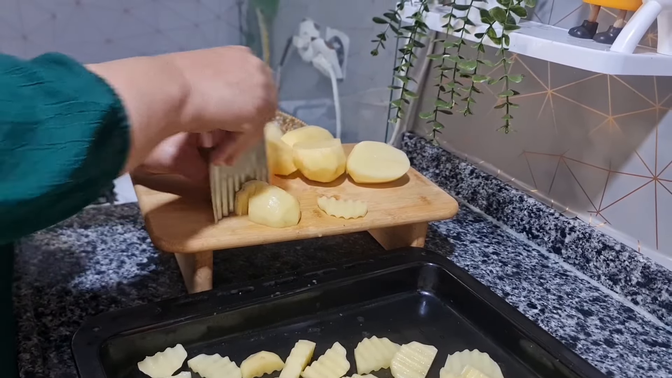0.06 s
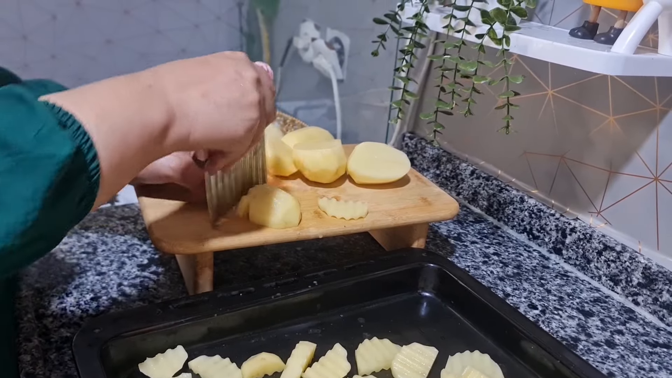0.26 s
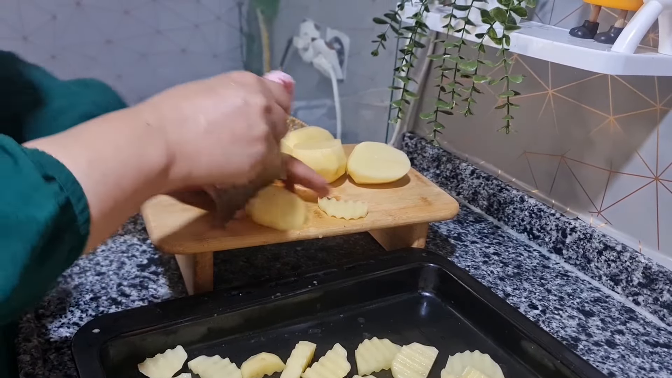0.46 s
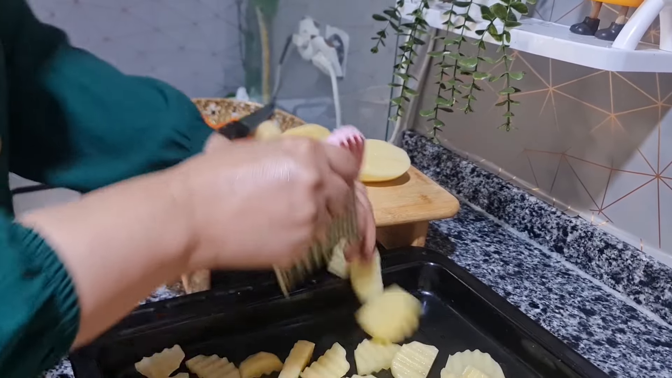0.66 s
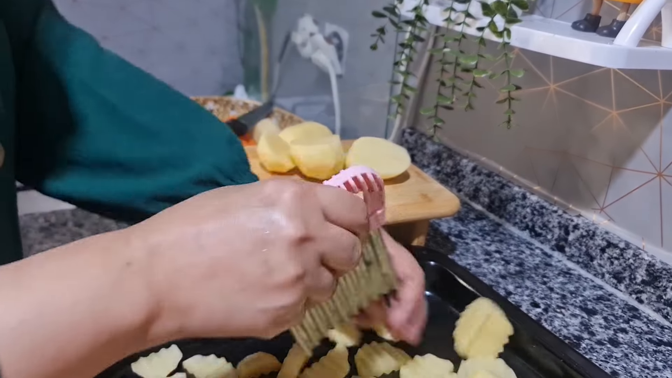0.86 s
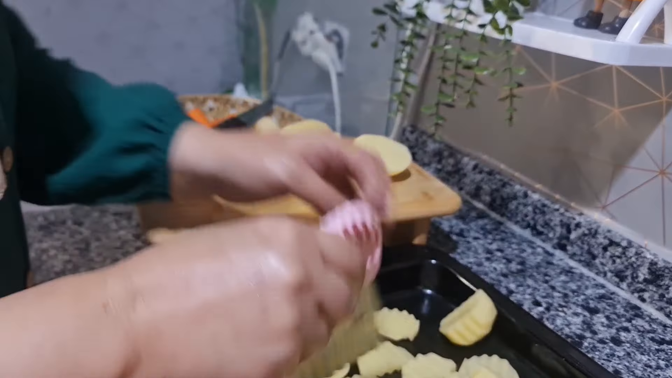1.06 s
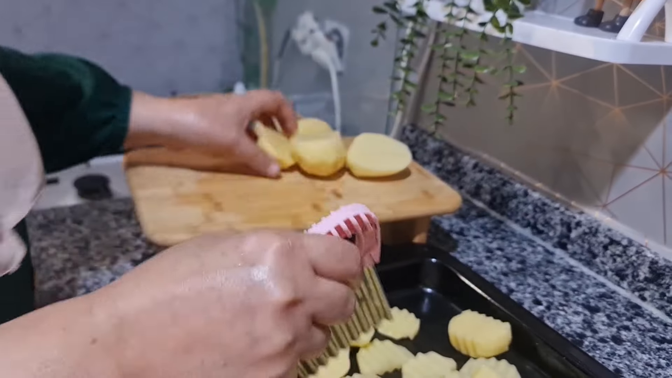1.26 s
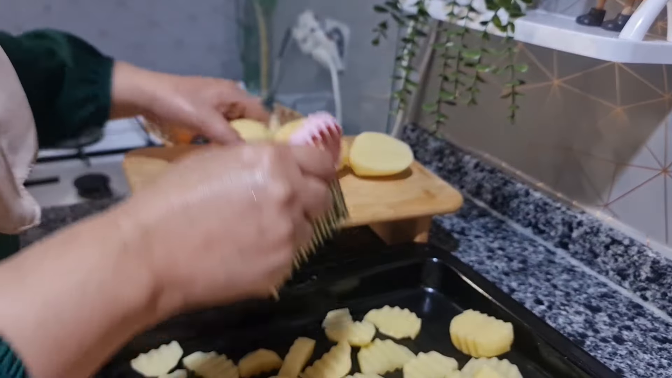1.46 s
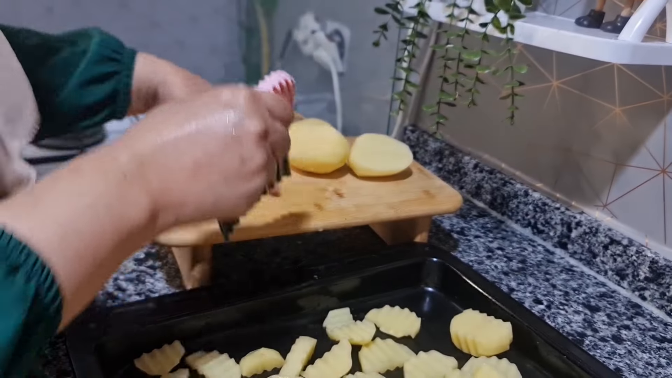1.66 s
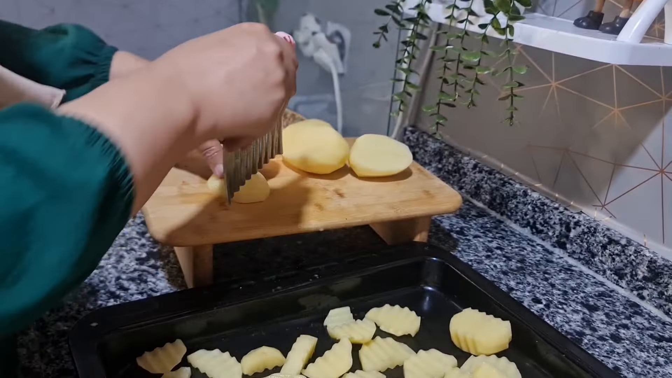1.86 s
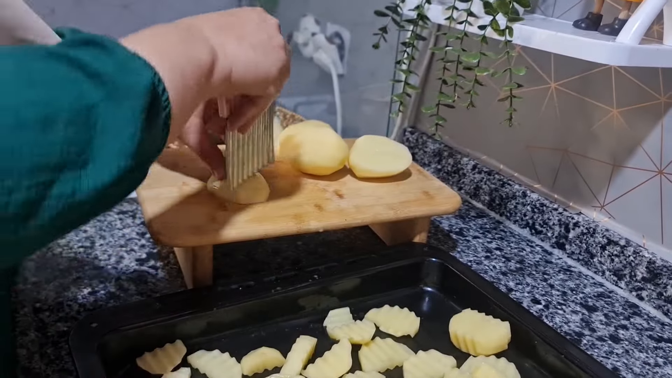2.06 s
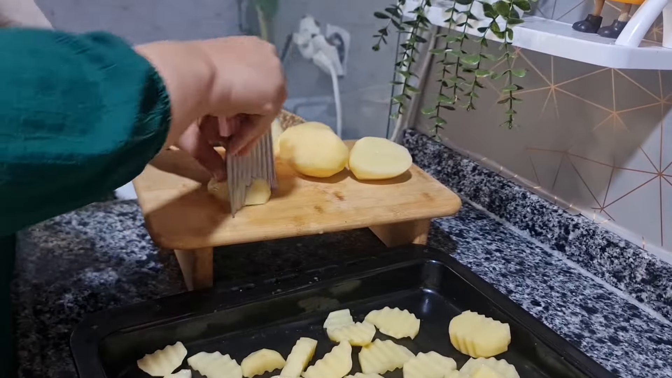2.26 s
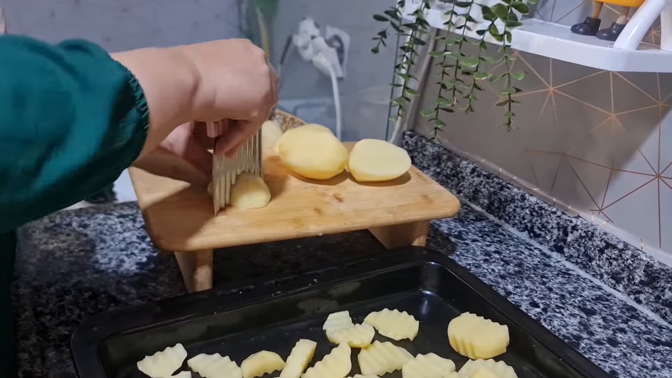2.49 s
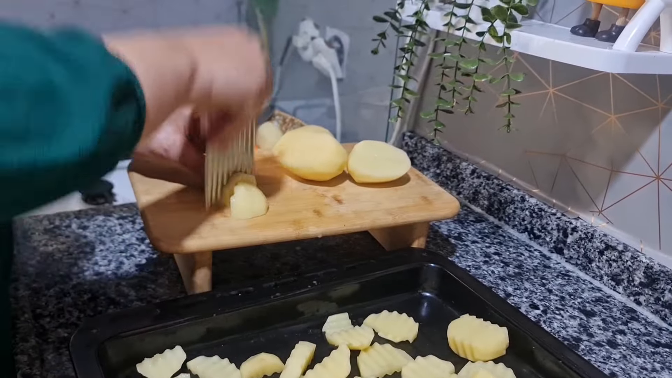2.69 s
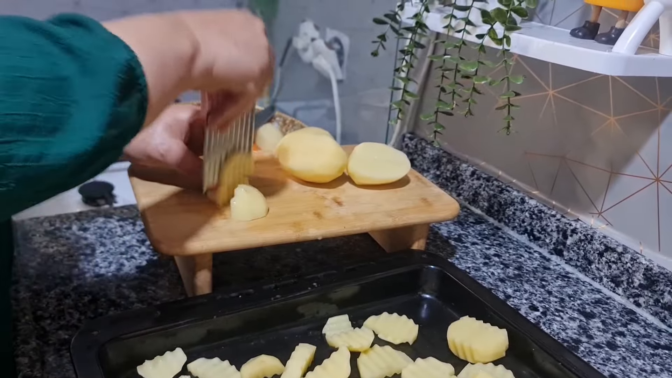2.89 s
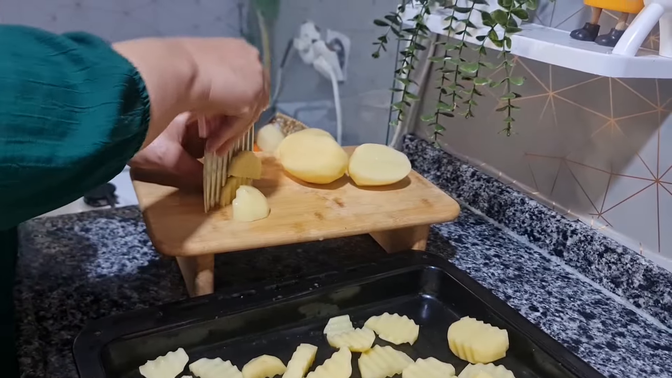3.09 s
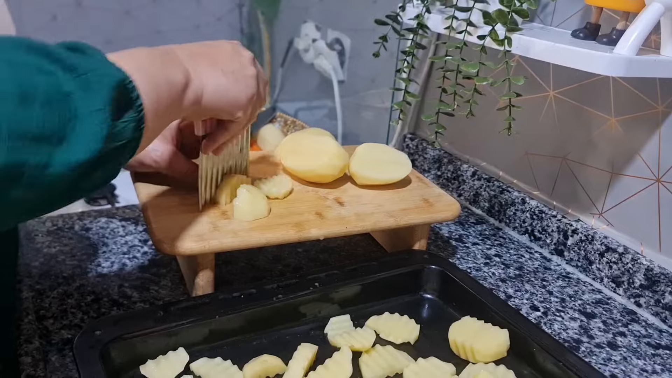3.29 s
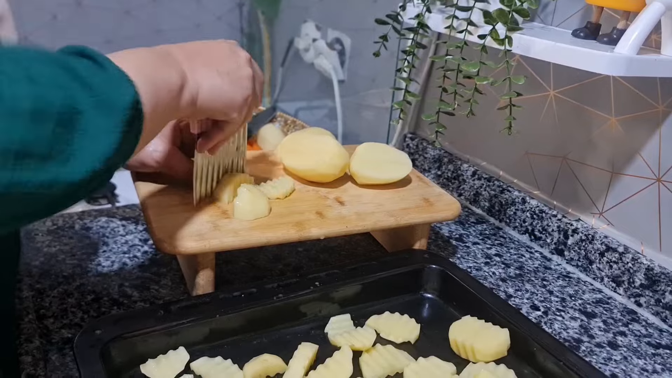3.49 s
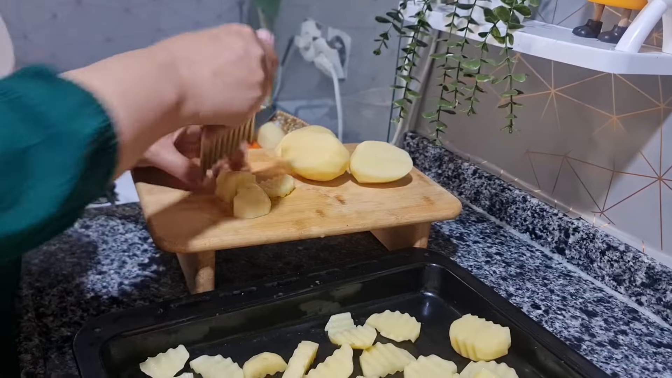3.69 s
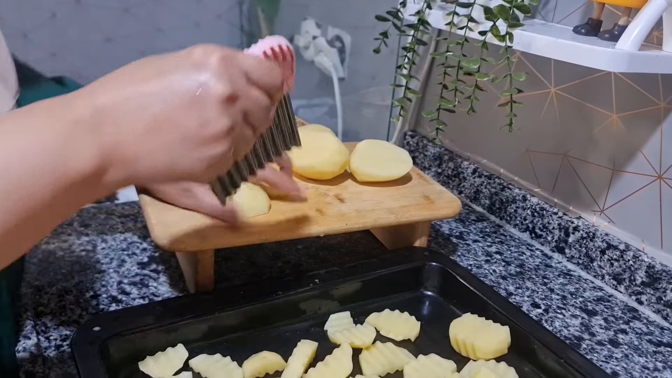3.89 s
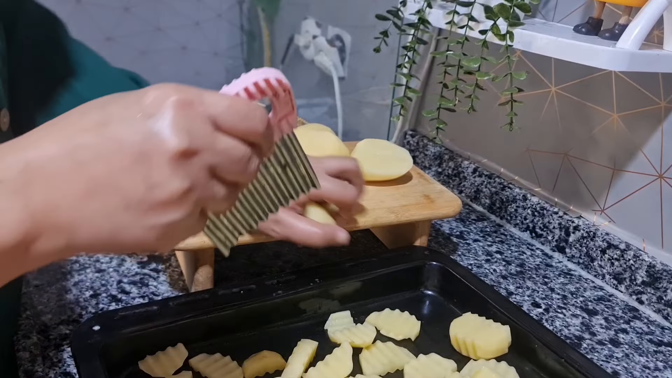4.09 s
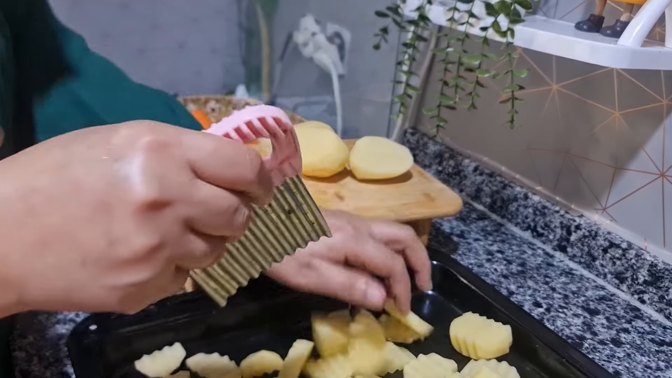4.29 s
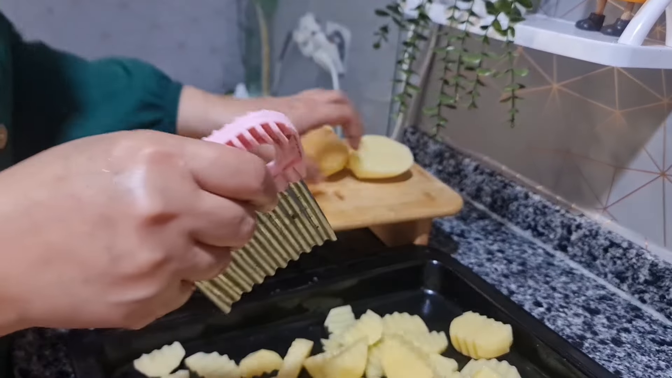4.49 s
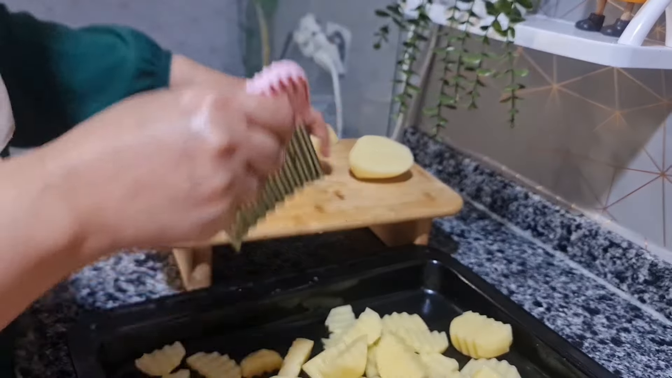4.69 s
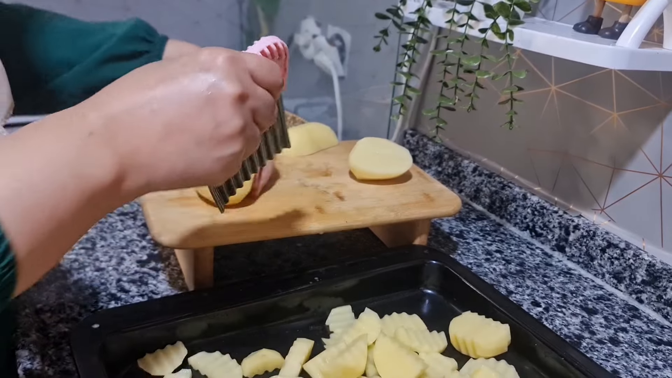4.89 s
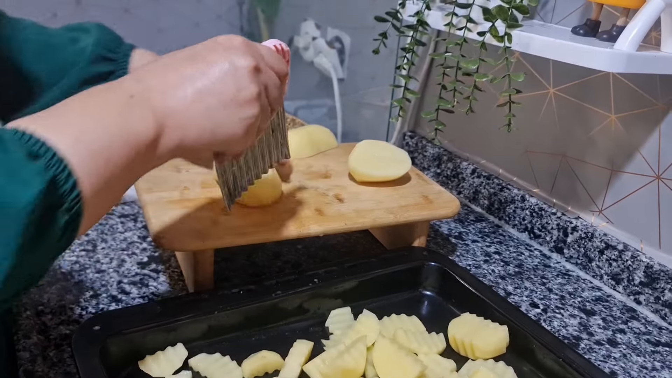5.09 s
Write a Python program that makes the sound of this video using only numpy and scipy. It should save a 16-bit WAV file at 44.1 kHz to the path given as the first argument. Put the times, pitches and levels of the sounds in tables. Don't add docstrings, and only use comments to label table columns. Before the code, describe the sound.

Loud crunchy chops of a wavy steel cutter through raw potatoes on a wooden board, after slices scrape and patter onto a metal tray.

```python
import sys
import numpy as np
from scipy import signal
from scipy.fft import rfft, irfft, next_fast_len
from scipy.io import wavfile
from scipy.ndimage import uniform_filter1d, map_coordinates

SR = 44100
rng = np.random.default_rng(int(sys.argv[2]) if len(sys.argv) > 2 else 0)


def generate_wav(sig):
    pcm = np.round(np.clip(np.atleast_2d(sig).T, -1, 1) * 32767).astype(np.int16)
    wavfile.write(sys.argv[1], SR, pcm)


def rack_gain(trim_db):
    fader = np.asarray(trim_db, float)
    return 10 ** (fader / 20)


N = 227070

# start in seconds, peak in
# dB, clack in dB, leg thud in dB, clack centre in Hz.
CHOPS = [
    (2.254, -10.5, -12.5, -22, 2310),
    (2.545, -11.5, -5, -18, 2740),
    (2.806, -13.5, 4, -18.5, 2900),
    (3.07, -13, 2, -16.5, 2665),
    (3.325, -13, -5, -22, 2040),
    (3.569, -8.5, -5.5, -24, 2435),
    (5.003, -19.5, -33, -12.5, 1510),
]
# start in seconds, peak in dB, clack in dB,
# thud in dB, hardness in Hz.
TAPS = [(0.362, -31, -3.5, -13, 1940), (0.385, -49, 8, 9, 1500), (0.512, -36, -25, -9, 1500),
        (1.44, -31.5, -28, -6.5, 600), (1.476, -61, -21, -15, 700), (1.831, -37, -5.5, -5.5, 2220),
        (1.841, -47, -24, 4, 900), (2.206, -28.5, -11, -7, 1410), (2.455, -43.5, -17.5, 7, 700),
        (2.498, -26.5, -17.5, -27.5, 1210), (2.769, -27, -16.5, -6.5, 1200), (3.016, -28, -22.5, -2, 1100),
        (3.028, -25, -15.5, -16, 1110), (3.294, -31.5, -5, 0, 1620), (3.722, -27, -9, -4.5, 1310),
        (4.648, -44.5, -19, 7, 880), (4.743, -36, -32, 2.5, 980), (4.988, -39, -25, -11, 500)]
BUMPS = [
    (1.431, -35, -21, -3.5, 600),
    (3.243, -39, -31, -15.5, 600),
    (3.31, -23.5, -27.5, -22, 700),
    (3.496, -34.5, -26.5, -4.5, 600),
    (3.571, -18, -34.5, -23.5, 700),
    (3.582, -14.5, -35.5, -27, 600),
]
SHOVES = [
    (4.984, -29.5, -40, -23, 400),
    (5.008, -26, -38, -27, 400),
    (5.128, -39.5, -31, -17, 500),
]
# start at the skin in seconds, length in seconds, force in dB, juice in dB.
CUTS = [
    (2.205, 0.062, -35, -9.5),
    (2.498, 0.059, -30.5, -10.5),
    (2.768, 0.057, -28, -13),
    (3.034, 0.056, -26.5, -13.5),
    (3.294, 0.044, -28.5, -15),
    (3.546, 0.028, -29, -12),
]
# time of full
# force in seconds, rise in seconds, fall in seconds, force in dB, rustle in dB.
RUBS = [(0, .01, 0.056, -38, -44), (.182, 0.045, 0.036, -61, -35), (.286, .02, 0.11, -81.5, 10.5),
        (.518, 0.028, 0.033, -52, -4), (.602, 0.043, 0.023, -30.5, -31), (.77, 0.086, 0.077, -52.5, -26),
        (.85, 0.046, 0.26, -60, -9), (1.14, 0.11, 0.64, -67.5, -7.5), (1.486, 0.12, 0.074, -60, -14),
        (1.72, 0.099, 0.24, -64.5, -21), (2.14, 0.075, 0.029, -67, -1), (2.19, 0.018, 0.011, -57.5, -2),
        (4.362, 0.014, 0.026, -55.5, -28), (4.62, 0.9, 0.26, -70.5, 1), (4.75, 0.072, 0.027, -60, -21)]
# time of full force in seconds, rise in seconds, fall in seconds, force in
# dB, skin noise in dB.
SWEEPS = [
    (.602, 0.044, .05, -59, 6.5),
    (.78, 0.044, 0.13, -65, 0),
    (4.0, 0.046, .2, -72.5, 7),
    (4.14, .22, 0.19, -57.5, -3),
    (4.67, 0.017, .1, -62, -23),
]
# start in seconds, peak in dB, clack in dB, thud in dB,
# clack centre in Hz.
DROPS = [
    (0.731, -38.5, -4, -15.5, 2940),
    (0.817, -36, 0.5, -30, 2260),
    (0.914, -31, 3.5, -14, 2500),
    (0.95, -29.5, 2, -11, 2380),
    (4.31, -52.5, 0.5, -15, 2260),
    (4.342, -41, 0, -20, 2920),
]
FLOPS = [
    (4.406, -39.5, -3, -13, 955),
    (4.435, -31.5, -5.5, -18, 1250),
    (4.467, -43, -11, -2, 1084),
]
TICKS = [
    (0.178, -61.5, 11, -18, 3140),
    (0.764, -39.5, -8, -24, 1260),
    (0.801, -49, 8.5, -22, 3050),
    (0.988, -40, 1, -2.5, 1150),
    (2.455, -67.5, 15, -20, 4410),
]
# start in seconds, peak in dB, clack in dB, thud in dB,
# hardness in Hz.
BOOMS = [
    (0.732, -30.5, -23, -0.5, 600),
    (0.76, -33.5, -21, -4.5, 500),
    (4.311, -38.5, -20, -14, 700),
    (4.328, -40.5, -25, -11, 500),
    (4.344, -35, -25, -11, 450),
    (4.468, -40, -25, -10, 453),
]
# start in seconds, peak in dB.
SMACKS = [(0.362, -43), (0.731, -40), (0.817, -55), (0.914, -45), (1.831, -43.5), (2.206, -47),
          (2.498, -50), (3.293, -37), (3.721, -43), (4.31, -51.5), (4.743, -72.5), (4.983, -62)]

# pitch in Hz, level in dB, time to fall by 60 dB in seconds.
BOARD = [(406.2, -7.5, 0.085), (523, -13, 0.076), (546.2, -7, 0.064), (592.4, -9, 0.065), (726, -7, 0.046),
         (835, -7.5, 0.05), (1052, 2, 0.023), (1099, 0, 0.019), (1420, -8, 0.036)]
LEGS = [(91.8, -7.5, 0.068), (133.5, -5.5, 0.089), (239.7, -3, 0.033), (291, -22.5, 0.37)]
HOLLOW = [(546.4, -3, 0.066), (600, -2, .07), (482, -11, 0.036), (667, -8.5, .04)]
WORKTOP = [(136, 0, 0.095), (89, -10.5, 0.17), (165, -5, .07)]
TRAY = [(302, -15.5, 0.014), (637, -8.5, 0.017), (950, -20, 0.029), (1330, -14, 0.0045)]
SHEET = [(136, -4, .12), (236, -0.5, 0.09), (306.5, 0, 0.08), (424, -5.5, 0.055), (600, -2.5, 0.048)]

# frequency in Hz, level in dB per Hz.
RASP = [(500, -14.5), (1200, 7), (2000, 6), (2900, 7.5), (3700, 0), (4500, -4.5), (6500, -3.5), (8500, -27)]
# frequency in Hz, level in dB per Hz.
KNOCK = [(300, -55.5), (420, 6), (1100, -1), (2000, -10), (3500, -28), (6000, -66.5)]
# frequency in Hz, level in dB per Hz.
FIZZ = [(5000, -37.5), (7000, 6.5), (10000, -4.5), (13000, -2), (15700, -10), (16400, -30.5)]
# frequency in Hz, level in dB per Hz.
RUSTLE = [(5200, -6.5), (6700, 2.5), (7700, -11), (10000, -16), (15700, -19.5), (16400, -35)]
# frequency in Hz, level in dB per Hz.
PALM = [(2500, -11), (4000, 4), (5500, -7), (6800, -3), (8000, -14), (12000, -13.5), (15700, -16),
        (16400, -46)]
# frequency in Hz, level in dB per Hz.
WET = [(1500, -20.5), (4000, 2.5), (6000, -1.5), (9000, -8), (15700, -5.5), (16400, -36.5)]
# frequency in Hz, level in dB per Hz.
HUSH = [(12, -44), (20, 2.5), (65, -0.5), (114, 0.5), (243, -17), (402, -12), (933, -27), (1100, -23),
        (1730, -27), (2630, -21.5), (6640, -40.5), (9300, -62.5), (14600, -58.5), (16300, -64.5)]
# frequency in Hz, time to fall by 60 dB in seconds.
WALLS = [(130, 0.58), (400, 0.38), (1000, 0.33), (3000, 0.3), (6000, 0.3), (13000, 0.16)]
# frequency in Hz, left-right likeness from -1 to 1.
ALIKE = [(60, 0.97), (130, 0.96), (290, 0.79), (640, 0.55), (1410, 0.04), (3100, -0.03), (6820, 0.05),
         (15000, -0.01)]
# frequency in Hz, left minus right in dB.
PORTS = [(60, -2.0), (110, -2.0), (200, -2.5), (380, -2.0), (700, -2.0), (1290, -2.0), (2380, -5.5),
         (4400, -6.5), (8120, -2.5), (15000, -1.0)]

HUSH_DB = -57
CRACK_T60, SMACK_T60 = 0.024, 0.018
CUT_SWELL_DB, CUT_FADE_S = 10.5, 0.011
RUB_ROUND = 1.31
TOP_HZ = 15850


def unit(x):
    return x / np.sqrt(np.mean(x ** 2) + 1e-20)


def along(points, hz):
    f, v = np.transpose(points)
    return np.interp(np.log(hz + 1), np.log(f + 1), v)


def filtered(x, response):
    m = next_fast_len(x.shape[-1] + SR // 10)
    return irfft(rfft(x, m) * response(np.fft.rfftfreq(m, 1 / SR)), m)[..., :x.shape[-1]]


def related(pair):
    def mix(hz):
        turn = np.arccos(np.clip(along(ALIKE, hz), -1, 1)) / 2
        return np.array([np.cos(turn), np.sin(turn)])
    mid, side = filtered(pair, mix)
    return np.array([mid + side, mid - side])


def ring(modes, scatter_db, attack, t):
    hz, db, t60 = np.transpose(modes)[:, :, None]
    strength, phase = rng.standard_normal((2,) + hz.shape)
    level = rack_gain(db + scatter_db * strength - 60 * t / t60)
    x = np.sum(level * np.sin(2 * np.pi * hz * t + phase), 0)
    x = x * (1 - np.exp(-t / attack))
    return x / np.max(np.abs(x))


def puff(spectrum, rise, t60, t):
    grain = rack_gain(1.2 * unit(uniform_filter1d(rng.standard_normal(len(t)), size=50)))
    click = np.arange(len(t)) == SR // 200
    x, click = filtered(np.array([rng.standard_normal(len(t)), click]), lambda f: rack_gain(along(spectrum, f)))
    x = x * grain * rack_gain(-60 * t / t60) * (1 - np.exp(-t / rise))
    x = x / np.max(np.abs(x))
    return np.array([x, click * np.linalg.norm(x) / np.linalg.norm(click)])


def contacts(table, body, attack, chatter, chatter_db, knock_db, crunch_t60, spread, crack_db, give, trim_db):
    out, t = np.zeros((2, N + SR)), np.arange(SR // 6) / SR
    soft = signal.butter(2, 2600, fs=SR, output="sos")
    body_db, clack_trim_db, leg_db = trim_db
    for s, db, clack_db, thud_db, clack_hz in table:
        touches, luck = np.zeros(SR // 10), rng.random((2, 6))
        touches[(chatter * SR * luck[0]).astype(int)] = rack_gain(chatter_db) * (2 * luck[1] - 1)
        touches[0] = 1
        wood = signal.fftconvolve(ring(body, 0.87, attack, t), touches)[:len(t)]
        wood = wood + rack_gain(knock_db) * puff(KNOCK, attack, crunch_t60, t)
        wood = rack_gain(body_db) * wood + rack_gain(leg_db + thud_db) * ring(LEGS, 0.57, 0.0018, t)
        band = [clack_hz / (1 + spread), min(clack_hz * (1 + spread), 7000)]
        spot = signal.butter(2, band, "band", fs=SR, output="sos")
        clack = signal.sosfilt(spot, puff(RASP, attack, crunch_t60, t))
        clack = clack / np.max(np.abs(clack[0]))
        blow = signal.sosfilt(soft, wood) + rack_gain(clack_trim_db + clack_db) * clack
        blow += rack_gain(crack_db) * puff(RASP, 0.00012, CRACK_T60, t)
        dull = signal.butter(4, give * clack_hz, fs=SR, output="sos")
        out[:, round(s * SR):][:, :len(t)] += rack_gain(db) * signal.sosfilt(dull, blow)
    return out[:, :N]


def board_blows():
    hits = contacts(CHOPS, BOARD, attack=0.00092, chatter=0.018, chatter_db=-12.5, knock_db=2.5,
                    crunch_t60=0.068, spread=0.76, crack_db=-10, give=2.73, trim_db=(-1, 8.5, 4.5))
    hits += contacts(TAPS, BOARD, attack=0.0045, chatter=0.014, chatter_db=-19, knock_db=-15.5,
                     crunch_t60=0.05, spread=1, crack_db=-25, give=1.25, trim_db=(-1, -1, -5.5))
    hits += contacts(BUMPS, HOLLOW, attack=0.0029, chatter=0.01, chatter_db=-8.5, knock_db=-8,
                     crunch_t60=0.05, spread=0.6, crack_db=-30, give=1.7, trim_db=(0, 0, 0))
    hits += contacts(SHOVES, WORKTOP, attack=0.0044, chatter=0.0073, chatter_db=-24, knock_db=-16,
                     crunch_t60=0.062, spread=0.6, crack_db=-41, give=2.4, trim_db=(0, 0, 0))
    return hits


def strokes(rows, swell_db):
    t = np.arange(N // 32 + 2) * 32 / SR
    gains = np.zeros((3, len(t)))
    for s, *shape, db, fizz_db in rows:
        gains += rack_gain(db + swell_db(t - s, *shape)) * rack_gain(np.array([[fizz_db], [0], [0]]))
    return np.array([np.interp(np.arange(N) / SR, t, g) for g in gains])


def friction(gains, top, grain_db, wood_hz, trim_db):
    first, last = np.flatnonzero(gains.max(0) > 1e-7)[[0, -1]]
    fizz, rasp, body = gains[:, first:last] * rack_gain(trim_db)[:, None]

    def grains():
        spikes = rack_gain(grain_db * unit(uniform_filter1d(rng.standard_normal(last - first), size=60)))
        return unit(related(rng.standard_normal((2, last - first))) * spikes)

    def wood(f):
        total = 0
        for k, (c, db, t60) in enumerate(BOARD):
            damping = 1j * f * 3 / t60
            total = total + (-1) ** k * rack_gain(db) * damping / (c * c - f * f + damping)
        return total / (1 + 1j * f / wood_hz) ** 2

    def heard(gain, response):
        strength = np.sqrt(np.mean(np.abs(response(np.arange(SR // 2))) ** 2))
        return filtered(gain * grains(), response) / strength

    sound = heard(fizz, lambda f: rack_gain(along(top, f)))
    sound = sound + heard(rasp, lambda f: rack_gain(along(RASP, f))) + heard(body, wood)
    return np.pad(sound, [(0, 0), (first, N - last)])


def cut(t, length):
    late = t - length
    return np.where(t < 0, -200, np.where(late < 0, CUT_SWELL_DB * late / length, -20 * late / CUT_FADE_S))


def rub(t, rise, fall):
    return -20 * np.abs(t / np.where(t < 0, rise, fall)) ** RUB_ROUND


def slicing():
    return friction(strokes(CUTS, cut), FIZZ, grain_db=2.5, wood_hz=2500, trim_db=(-3, -3, -7))


def rubbing():
    return friction(strokes(RUBS, rub), RUSTLE, grain_db=3.5, wood_hz=2500, trim_db=(-3, -3, -1))


def sweeping():
    return friction(strokes(SWEEPS, rub), PALM, grain_db=0.7, wood_hz=480, trim_db=(-3.5, -3.5, 3.5))


def tray_drops():
    drops = contacts(DROPS, TRAY, attack=0.00033, chatter=0.0056, chatter_db=-11, knock_db=-8,
                     crunch_t60=0.11, spread=0.52, crack_db=-6, give=1.16, trim_db=(-1, 9, 1.5))
    drops += contacts(FLOPS + TICKS, TRAY, attack=0.0012, chatter=0.0029, chatter_db=-7.5, knock_db=1.5,
                      crunch_t60=0.052, spread=0.47, crack_db=-15, give=1.8, trim_db=(-3, 6, 1.5))
    drops += contacts(BOOMS, SHEET, attack=0.0006, chatter=0.03, chatter_db=-12, knock_db=-9,
                      crunch_t60=0.05, spread=0.42, crack_db=-30, give=1.94, trim_db=(0, 0, 0))
    return drops * rack_gain([[0], [-8]])


def smacks():
    out, t = np.zeros((2, N + SR)), np.arange(SR // 10) / SR
    for s, db in SMACKS:
        out[:, round(s * SR):][:, :len(t)] += rack_gain(db) * puff(WET, 0.00034, SMACK_T60, t)
    return out[:, :N]


def kitchen(x):
    out, step = np.zeros((2, N + 2 * SR)), SR // 4
    for start in range(0, N, step):
        hz, t, z = signal.stft(rng.standard_normal((2, SR // 2)), SR, nperseg=256)
        fade = rack_gain(-60 * t / along(WALLS, hz)[:, None])
        tail = signal.istft(z * fade, SR, nperseg=256)[1]
        build_up = 1 - np.exp(-np.arange(tail.shape[1]) / SR / 0.00067)
        tail = related(tail * build_up)
        wet = signal.fftconvolve(x[None, start:start + step], tail / np.linalg.norm(tail[0]), axes=1)
        out[:, start:start + wet.shape[1]] += wet
    return out[:, :N]


def hush():
    def sway(rate_hz):
        return map_coordinates(rng.standard_normal(60), [np.arange(N) * rate_hz / SR])
    noise = unit(filtered(related(rng.standard_normal((2, N))), lambda hz: rack_gain(along(HUSH, hz))))
    rumble = filtered(noise, lambda hz: 1 / (1 + (hz / 600) ** 4))
    air = noise - rumble
    return rack_gain(HUSH_DB + 2.5) * (rack_gain(3.5 * sway(4.8)) * rumble + rack_gain(1.4 * sway(5.2) - 2.5) * air)


def scene():
    hits = board_blows() + tray_drops() + smacks()
    rubs = slicing() + rubbing() + sweeping()
    near = np.array([np.roll(hits[0], shift=9), hits[0]]) + rubs
    return near + rack_gain(-2.5) * kitchen(hits[1] + rubs[1]) + hush()


def low_pass(x):
    return signal.sosfilt(signal.butter(12, 16480, fs=SR, output="sos"), x)


def record(dry):
    shaded = filtered(dry, lambda hz: rack_gain(np.outer([0.5, -0.5], along(PORTS, hz))))
    rounded = shaded / (1 + np.abs(shaded / 0.95) ** 4) ** 0.25
    banded = filtered(rounded, lambda hz: hz < TOP_HZ)
    return low_pass(banded)


dry = scene()
out = record(dry)
generate_wav(out)
```